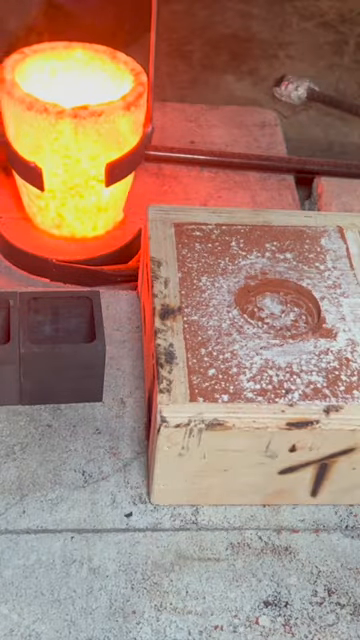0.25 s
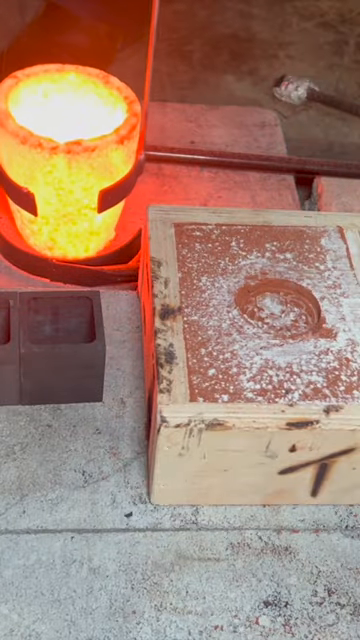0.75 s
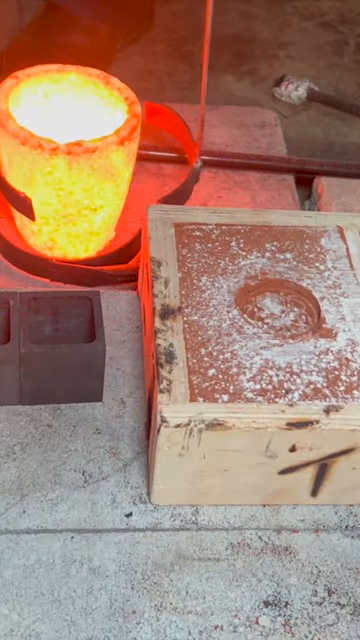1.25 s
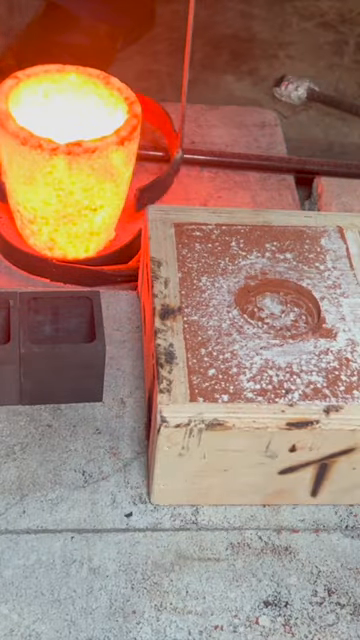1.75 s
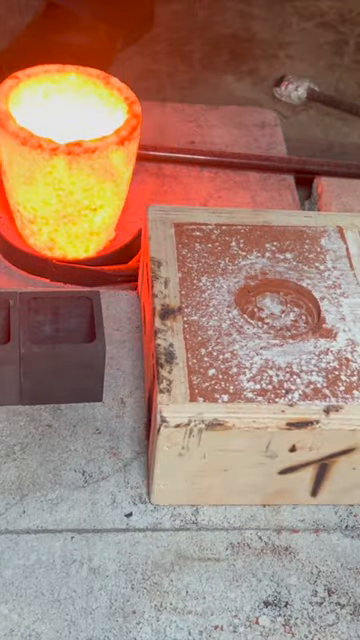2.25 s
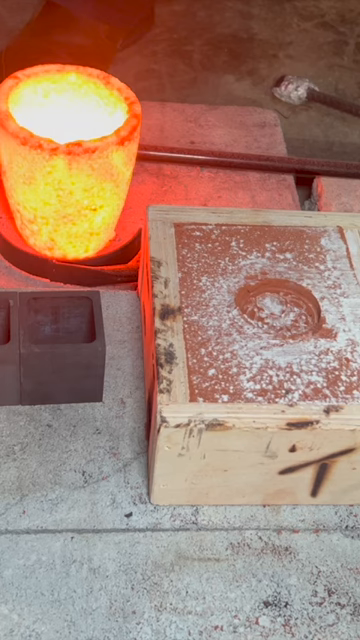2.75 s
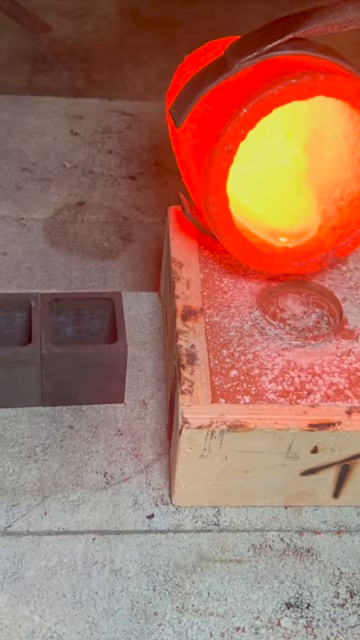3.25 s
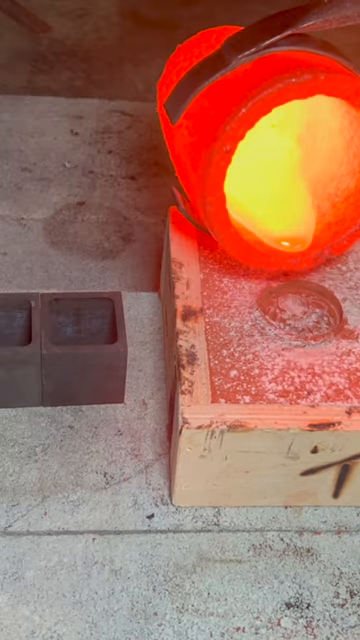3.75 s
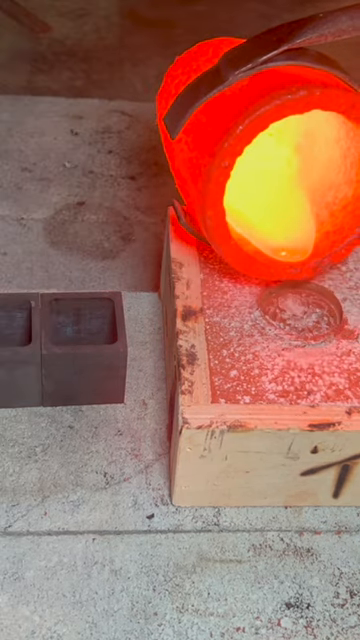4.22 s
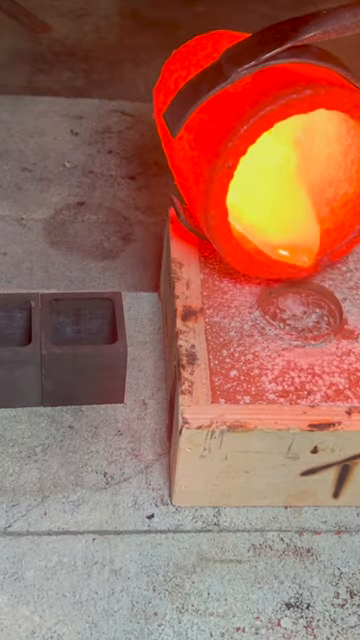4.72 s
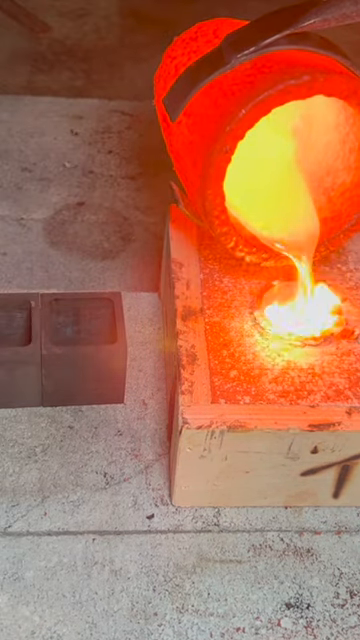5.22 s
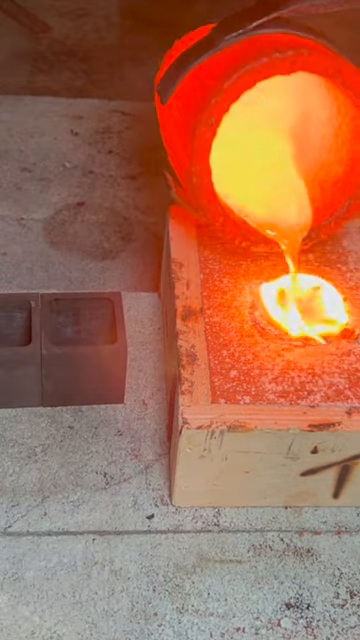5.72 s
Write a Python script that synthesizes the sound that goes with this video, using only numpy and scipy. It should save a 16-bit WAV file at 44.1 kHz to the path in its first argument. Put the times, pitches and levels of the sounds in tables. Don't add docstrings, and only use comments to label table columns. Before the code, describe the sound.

In a small workshop over low rumble and faint hiss, tongs scrape a hot crucible in short gritty strokes with a hollow hum. They drop left with a bright clang. After a cut come soft knocks and creaks, then molten metal splutters in a sand mould and a loose handle tinkles. Close stereo microphone.

```python
import sys
import numpy as np
from scipy import signal
from scipy.fft import rfft, irfft, next_fast_len
from scipy.io import wavfile
from scipy.ndimage import uniform_filter1d

SR = 44100
rng = np.random.default_rng(int(sys.argv[2]) if len(sys.argv) > 2 else 0)


def wav_out(sig):
    wavfile.write(sys.argv[1], SR, np.round(np.clip(np.atleast_2d(sig).T, -1, 1) * 32767).astype(np.int16))


def boost_factor(decibels):
    exponent = np.asarray(decibels, float) / 20
    return 10 ** exponent


N = 263718

# (time [s], bustle [dB])
BUSTLE = [(0.0, 2.5), (0.42, 1), (0.63, 8), (1.01, 2), (1.7, 0), (2.33, 3.5), (2.47, 14), (2.92, 5),
          (3.0, -0.5), (3.25, 4.5), (3.48, 8.5), (3.7, 1), (3.86, 2), (4.08, 5.5), (4.7, 1.5), (5.06, 4.5),
          (5.61, 2.5), (5.98, 6.5)]
# (start [s], end [s], level [dB])
CHANGE = (2.873, 2.901, -6)


def evened(x):
    return x / np.sqrt(np.mean(x ** 2) + 1e-20)


def read(points, hz):
    f, value = np.transpose(points)
    return np.interp(np.log(hz + 1), np.log(f + 1), value)


def curve(rows):
    return np.interp(np.arange(N) / SR, *np.transpose(rows))


def add(mix, s, sound):
    part = mix[round(s * SR):][:len(sound)]
    part += sound[:len(part)]


def swell(s, db, rise, t60, hold=0):
    t = np.arange(N) / SR - s
    return np.clip(t / rise, 0, 1) ** 2 * boost_factor(db - 60 * np.maximum(t - rise - hold, 0) / t60)


def colour(x, points):
    size = next_fast_len(x.shape[-1] + 2048, True)
    gain = boost_factor(read(points, np.fft.rfftfreq(size, 1 / SR)))
    return irfft(rfft(x, size) * gain, size)[..., :x.shape[-1]]


def band(x, lo_hz, hi_hz):
    sos = signal.butter(2, [lo_hz, min(hi_hz, SR / 2.1)], "bandpass", fs=SR, output="sos")
    return signal.sosfilt(sos, x)


def resonate(x, hz, width):
    r = np.exp(-np.pi * width / SR)
    return signal.lfilter([1 - r * r, 0, r * r - 1], [2, -4 * r * np.cos(2 * np.pi * hz / SR), 2 * r * r], x)


def resonate_twice(x, hz, width):
    return evened(resonate(resonate(x, hz, width), hz, width))


def ring(modes, seconds):
    t = np.arange(round(seconds * SR)) / SR
    return sum(boost_factor(db - 60 * t / t60) * np.sin(2 * np.pi * (hz * t + rng.random())) for hz, db, t60 in modes)


def pings(rows):
    out, t = np.zeros(N), np.arange(5000) / SR
    for (s, db, hz, t60), (gap, phase) in zip(rows, rng.uniform(-1.03, 1, (len(rows), 2))):
        partner_hz = hz * (1 + .06 * gap)
        pair = np.sin(2 * np.pi * hz * t) + .4 * np.sin(2 * np.pi * (partner_hz * t + phase))
        add(out, s, boost_factor(db - 60 * t / max(t60, .004)) * np.minimum(t / .0006, 1) * pair)
    return out


def air(points, patchy_db, flicker_db, size=512):
    # (frequency [Hz], likeness [1])
    coherence = [(40, 0.96), (100, 1), (400, 0.29), (1000, 0.1), (2500, 0.27), (5500, .2), (7000, 0.31)]
    frames, hz = N // (size // 4) + 5, np.fft.rfftfreq(size, 1 / SR)
    a, b, c, d, patches = rng.standard_normal((frames, len(hz), 5)).T
    patches = evened(uniform_filter1d(uniform_filter1d(patches, size=6, axis=0), size=20, axis=1))
    flicker = evened(uniform_filter1d(rng.exponential(1, frames) - 1, size=3))
    same = np.clip(read(coherence, hz), -1, 1)[:, None]
    left = a + 1j * b
    z = np.array([left, same * left + np.sqrt(1 - same ** 2) * (c + 1j * d)])
    z *= boost_factor(read(points, hz)[:, None] + patchy_db * patches + flicker_db * flicker)
    return evened(signal.istft(z, nperseg=size, noverlap=size - size // 4)[1][:, :N])


def floor_rumble(drive):
    # (frequency [Hz], density [dB per Hz])
    rumble_spectrum = [(12, -39), (25, -14), (42, 5), (85, 0), (102, -8.5), (161, -10.5), (195, -18),
                       (269, -27), (367, -28.5), (392, -40), (500, -38), (650, -64), (1100, -120)]
    # (frequency [Hz], width [Hz], level [dB])
    room_modes = [(82, 11, 2.5), (105, 16, -5), (160, 10, -15)]
    # (time [s], level [dB])
    drift = [(0.0, -68.5), (1.9, -70.5), (2.25, -65), (2.9, -65), (3.3, -61), (3.62, -59), (3.78, -69.5),
             (4.0, -65), (4.78, -70.5), (5.98, -66)]
    # (time [s], level [dB])
    thumps = [(.07, -70), (.55, -62), (.97, -58.5), (2.47, -50.5), (2.9, -62.5), (4.829, -55.5),
              (5.099, -65), (5.37, -73), (5.51, -62.5), (5.87, -79.5)]
    rumble = air(rumble_spectrum, 0.38, 0.11, size=4096)
    peaks = sum(boost_factor(db) * evened(resonate(drive, hz, w)) for hz, w, db in room_modes)
    shake = boost_factor(curve(drift)) + sum(swell(s, db, 0.023, 0.40606) for s, db in thumps)
    return shake * evened(rumble + peaks)


def furnace_draught(drive):
    # (frequency [Hz], width [Hz], level [dB])
    furnace = [(155, 7.9, -72), (97.1, 61, -65), (1749.5, 890, -97.5), (13710, 5900, -93)]
    # (time [s], level [dB])
    draught = [(0, -12), (1.2, -5), (2.15, -1), (2.25, 7), (2.87, -4), (2.9, -54)]
    return boost_factor(curve(draught)) * sum(boost_factor(db) * resonate_twice(drive, hz, w) for hz, w, db in furnace)


def creaking(drive):
    # (time [s], level [dB], hold [s], frequency [Hz])
    creaks = [(3.0, -82, .4, 2650), (3.8, -81, .5, 2600), (4.5, -85, .1, 2600), (5.0, -87, 0.41, 2600),
              (5.75, -79, .2, 2650), (3.03, -73, 0.079, 947), (3.26, -71, .27, 900), (3.28, -70, 0.16, 563),
              (3.06, -70, 0.046, 290), (3.3, -68, .28, 300), (4.0, -73, 0.26, 955), (4.08, -74, .14, 559),
              (4.08, -71, 0.19, 310)]
    q = 5
    return boost_factor(-9) * sum(swell(s, db, 0.054, 0.28, hold) * resonate_twice(drive, hz, hz / q)
                         for s, db, hold, hz in creaks)


def hiss_level():
    # (time [s], level [dB], rise [s], t60 [s])
    flares = [
        (2.3, -79.5, .2, 1.0),
        (4.82, -82, .2, 2.359),
    ]
    return boost_factor(-89.5 + 0.71 * curve(BUSTLE)) + sum(swell(*row) for row in flares)


def room_tone():
    # (frequency [Hz], density [dB per Hz])
    shuffle_spectrum = [(120, -16), (300, -0.5), (600, -11.5), (950, -15), (1500, -13.5), (2300, -14),
                        (4000, -28), (7000, -35.5)]
    # (frequency [Hz], density [dB per Hz])
    hiss_spectrum = [(2000, -27.5), (4000, -4), (5500, -10), (7500, -4.5), (10000, -2), (12500, -1),
                     (15500, 0.5), (16300, -29.5)]
    # (time [s], level [dB], rise [s], t60 [s])
    swing = (2.22, -73, .25, .05)
    drive = rng.standard_normal(N)
    shuffling = boost_factor(-84 + 1.266 * curve(BUSTLE)) * air(shuffle_spectrum, 2.2, 1.5)
    hiss = boost_factor(4.0) * hiss_level() * air(hiss_spectrum, 1.1, 1.9, size=256)
    whoosh = swell(*swing) * evened(band(drive, 1300, 5500))
    return furnace_draught(drive) + floor_rumble(drive) + shuffling + hiss + creaking(drive) + whoosh


def knocks():
    # (time [s], level [dB], weight [dB]: thud up,
    # tick down)
    small_knocks = [(1.949, -86, -11.5), (2.21, -80.5, 5.5), (2.838, -70, 10), (2.846, -69, 10),
                    (2.865, -68, 10.5), (2.854, -65.5, 10.5), (2.904, -51.5, 3.5), (2.923, -61.5, 13),
                    (3.043, -65.5, 4.5), (3.229, -73.5, 5.5), (3.313, -57.5, 5.5), (3.324, -68, 13.5),
                    (3.383, -67.5, 7), (3.451, -69.5, 4.5), (3.582, -62, -1), (3.589, -57, 8.5),
                    (3.629, -59, 3.5), (3.854, -73.5, 0.5), (3.893, -68.5, -0.5), (3.915, -63.5, 4.5),
                    (4.022, -79.5, -6), (4.102, -63, -8), (4.189, -71, 2.5), (4.217, -70, -2.5),
                    (4.264, -65.5, 6), (4.279, -64.5, 9.5), (4.619, -71.5, 6), (4.73, -70.5, 3.5),
                    (4.833, -59.5, 4), (4.883, -67.5, -0.5), (5.094, -82, -8), (5.283, -73, -7), (5.342, -65.5, 3),
             (5.362, -64.5, 5.5), (5.393, -73.5, -7), (5.877, -71.5, -1.5), (5.964, -61, 2)]
    out, t, rows = np.zeros(N), np.arange(4000) / SR, small_knocks
    body, snap = boost_factor(-60 * t / 0.034974), boost_factor(-60 * t / 0.0059)
    for (s, db, weight_db), noise in zip(rows, rng.standard_normal((len(rows), 4000))):
        thud = boost_factor(weight_db + 15) * band(noise * body, 190, 1237.6)
        knock = boost_factor(16.0) * band(noise * (0.38373 * body + snap), 890.0, 3261.8)
        tick = boost_factor(10.5 - weight_db) * band(noise * (0.79 * body + snap), 7500, 22000)
        add(out, s, boost_factor(db - 5.0) * (thud + knock + tick))
    grains = (rng.random(N) < 110 / SR) * boost_factor(6.25 * np.minimum(rng.exponential(1, N), 3))
    grains = grains * (np.arange(N) > CHANGE[1] * SR)
    puff = rng.standard_normal(200) * boost_factor(-60 * t[:200] / 0.0087)
    crackle = band(signal.oaconvolve(grains, puff)[:N], 3400.0, 15800)
    return out + boost_factor(2.0) * hiss_level() * crackle


def tinkle():
    # (time [s], peak [dB], low knock [dB], bell [dB])
    touches = [(5.6459, -56, -16.5, -32.5), (5.6556, -56, -13, -32), (5.6682, -65, -1, -20),
               (5.6867, -59, -2, -3), (5.6931, -58, -4, -25.5), (5.741, -58.5, -5, -20),
               (5.7917, -51, -8.5, -31), (5.828, -68.5, -10, -29.5), (5.8444, -62.5, -8.5, -29)]
    # (frequency [Hz], level [dB], t60 [s])
    handle_modes = [(8400, -1, 0.0278), (11500, -1.5, 0.027), (14096, -5, .022), (15500, -3.5, .018),
                    (2791.3, -15, 0.03)]
    out, t = np.zeros(N), np.arange(3000) / SR
    lucks = rng.standard_normal((len(touches), 2, len(handle_modes)))
    for (s, db, low_db, bell_db), luck in zip(touches, lucks):
        woken = [(hz * (1 + 0.0093 * a), level + 4.1 * b, t60)
                 for (hz, level, t60), a, b in zip(handle_modes, *luck)]
        puff = rng.standard_normal(len(t)) * boost_factor(-60 * t / 0.07424)
        add(out, s, boost_factor(db - 12.5) * ring(woken + [(5700, bell_db - 6, 0.06)], 0.17))
        add(out, s, boost_factor(db + low_db - 0.5) * band(puff, 1243.7, 2800.0))
        add(out, s, boost_factor(db - 10) * band(puff, 7200, 15500))
    return out


def splutter():
    # (time [s], peak [dB], pitch [Hz], sharp crack [dB])
    pops = [(4.835, -48, 483, -28), (4.8447, -52, 576, -1), (4.8515, -33.5, 760, -9.5),
            (4.855, -37, 685, -14), (4.86, -36, 600, -15), (4.865, -39, 616, -18), (4.868, -33.5, 640, -18),
            (4.875, -47, 477, -15), (4.8835, -54.5, 499, -3), (4.8896, -37, 557, -13.5),
            (4.897, -50, 450, -18), (4.905, -51.5, 600, -21), (4.913, -48, 560, -20),
            (4.9311, -39.5, 563, -20), (4.944, -48, 450, -13), (4.952, -53, 330, -18),
            (5.1, -48.5, 493, -10), (5.108, -54.5, 452, -20), (5.112, -56, 400, -10),
            (5.157, -59.5, 550, -10), (5.227, -54, 530, -12.5), (5.343, -50, 495, -15.5),
            (5.359, -57, 525, -8), (5.515, -52, 565, -12.5), (5.608, -60, 450, -11),
            (5.616, -55, 400, -17.5)]
    out, t = np.zeros(N), np.arange(1000) / SR
    for (s, db, hz, crack_db), luck in zip(pops, rng.uniform(-1, 1, (len(pops), 14))):
        bursts = [(-1, 1, 0), *luck[2:].reshape(4, 3)]
        for k, (late, size, pitch) in enumerate(bursts):
            f = hz * (1 + .35 * pitch)
            bubble = np.sin(2 * np.pi * f * t * (1 - 12 * t)) * np.exp(-f * t / 1.21) * np.minimum(t * f / .5, 1)
            crack_hz = 1500 * (1.04 + .15 * luck[1] + .3 * pitch)
            crack = np.sin(2 * np.pi * crack_hz * t) * t / 0.00044 * np.exp(1 - t / 0.00034)
            level = size * boost_factor(db + 1.5 - 9.4 * (k > 0))
            add(out, s + 0.00139 + 0.01 * (late + 1), level * (bubble + boost_factor(crack_db + 8.0) * crack))
    return out


def crucible_hum():
    # (frequency [Hz], width [Hz], level [dB])
    overtones = [(411, 98, 0.5), (640, 120, -2), (764, 125, -4.5), (874, 88, -11), (229, 80, -2)]
    # (time [s], level [dB], hold [s], hum [Hz], overtones [dB])
    strokes = [
        (0.521, -55, 0.033, 301, -9.5),
        (0.698, -69, .01, 310, 2),
        (0.989, -54, 0.013, 296, -3),
        (1.093, -60, 0.063, 307, -7.5),
    ]
    noise = rng.standard_normal(N)
    wall = evened(sum(boost_factor(db) * resonate_twice(noise, hz, w) for hz, w, db in overtones))
    wander, shake = evened(band(rng.standard_normal((2, N)), 7.7, 48))
    cycles = np.cumsum(1 + 0.039 * wander) / SR
    out = np.zeros(N)
    for s, db, hold, hz, wall_db in strokes:
        hum = boost_factor(3 + 2.5 * shake) * np.sin(2 * np.pi * hz * cycles)
        out += swell(s, db, 0.019, 0.1428, hold) * (boost_factor(wall_db) * wall + hum)
    return out


def scrape():
    # (time [s], peak [dB], shank [dB], slide [s])
    slips = [(0.337, -60, -35.5, 0.01703), (0.367, -61.5, -37, 0.0473), (0.4385, -64.5, -26, 0.17),
             (0.5185, -47, -26.5, 0.52), (0.5544, -43, -23.5, 0.01332), (0.5751, -62, -21, 0.081),
             (0.614, -45, -24.5, 0.033), (0.6655, -38.5, -42.5, 0.0762), (0.69, -45.5, -24, 0.12),
             (0.753, -57, -24.5, 0.25), (0.8147, -59, -35, 0.01224), (0.974, -50, -19.5, 0.1335),
             (0.991, -41.5, -17, 0.19), (1.01, -41.5, -14, 0.049), (1.0906, -46.5, -18.5, 0.065),
             (1.1368, -46.5, -16, 0.036), (1.179, -61, -12.5, 0.0583), (1.2342, -64, -23, 0.043),
             (1.25, -62, -17, 0.07)]
    grazes = [
        (2.4276, -36, -37.5, .02),
        (2.432, -57, -38, 0.31),
    ]
    # (time [s], level [dB], rise [s], t60 [s])
    drag = (0.7, -72.5, 0.7, 0.0004)
    # (frequency [Hz], level [dB], t60 [s])
    jaw_modes = [(3900, -14, .05), (5340, -9, .04), (5770, -9, 0.057), (5950, -8, 0.058), (6740, -10, .04),
                 (7170, -7, .05), (7410, 0, .07), (7570, -4, .06), (7960, -3, .03), (8400, 0.5, .035),
                 (9640, 2.5, .1), (10750, 2.5, 0.056), (11560, -2.5, 0.052), (12800, -4, .04),
                 (13600, -3, .04), (15350, -3, .06)]
    regripped_modes = [(4150, -14, .02), (5300, -7, .05), (5800, -6, .05), (6162, -9, .05),
                       (6765, -5, 0.061), (7400, -3, .04), (7900, 2, .04), (8240, -3, .05), (8460, -1, .05),
                       (9680, 3, .1), (10750, 2, .06), (11560, -2, .06), (12800, -5, .04), (13600, -5, .04),
                       (15350, -5, .06)]
    shank_modes = [(1529, -8, .12), (1870, -16, .06), (2215, -8, .1), (3763, -2, .21), (3794, -19, .1),
                   (4300, -12, .04)]
    # (frequency [Hz], density [dB per Hz])
    grit_spectrum = [(300, -0.5), (1200, -1), (2800, -10), (5000, -5), (8000, -1), (10000, 3.5),
                     (12500, -8), (15500, -10.5), (16300, -43.5)]
    # (time [s], level [dB], frequency [Hz], t60 [s])
    chinks = [(.519, -66, 3600, .06), (.517, -62, 805, 0.043), (.535, -64, 5950, .07),
              (.553, -61, 8420, .04), (.667, -63, 1650, .04), (.686, -64, 1050, .04), (.705, -61, 433, .07),
              (.705, -64, 620, .05), (.972, -63, 800, 0.043), (1.01, -58, 640, .07),
              (1.232, -70, 4000, .015)]
    regrip_s = .9
    grains = evened(rng.standard_normal(N) * boost_factor(2.3 * np.minimum(rng.exponential(1, N), 5)))
    jaws, handle, t = swell(*drag), np.zeros(N), np.arange(6000) / SR
    for s, db, shank_db, slide in slips + grazes:
        push = boost_factor(db - 3.5 - 60 * t / max(slide, .005)) * (1 - t / t[-1])
        add(jaws, s, push)
        add(handle, s, push * boost_factor(2 * shank_db + 19.5))
    late = np.arange(N) > regrip_s * SR
    steel = np.zeros(N)
    for held, modes in [(~late, ring(jaw_modes, .2)), (late, ring(regripped_modes, .2))]:
        steel += signal.oaconvolve(jaws * grains * held, modes / np.linalg.norm(modes))[:N]
    shank_ring = ring(shank_modes, .3)
    shank = signal.oaconvolve(handle * grains, shank_ring / np.linalg.norm(shank_ring))[:N]
    grit = colour(jaws * grains, grit_spectrum)
    return boost_factor(-4.0) * steel + boost_factor(1.5) * shank + boost_factor(-3.0) * grit + crucible_hum() + pings(chinks)


def clang():
    # (time [s], blow [dB], favoured frequency [Hz], its level [dB])
    blows = [
        (2.4848, -18, 13600, 4),
        (2.4871, -17.5, 7900, 3),
        (2.4934, -19.5, 5350, 5),
        (2.509, -24, 12200, 6),
        (2.513, -28, 6600, 4),
        (2.522, -27, 5900, 0),
    ]
    # (frequency [Hz], density [dB per Hz])
    crash_spectrum = [(60, -14), (250, -14), (800, -13.5), (1300, -7.5), (3000, -5.5), (5500, 0),
                      (9500, -3), (13500, -2.5), (15000, -11), (16500, -28)]
    steel_hz = [1007, 1400, 1852, 2180, 2336, 2524, 2884, 3494, 3779, 4084, 4500, 5345, 5830, 5930, 6417,
                6690, 6779, 7030, 7569, 7954, 8374, 8872, 9620, 10300, 11520, 12240, 12290, 12915, 13695,
                15340]
    steel_db = [-13, -12, -10, -7, -5, -7, -11, -6, -10, -8, -7, 5, -7, -10, -4.5, -10, -4.5, -8, -4.5, -8,
                -4, -9, -6, -7, -4.5, -5.5, -5.5, -2, -5, -13]
    # (frequency [Hz], t60 [s])
    damping = [(1000, .28), (2000, .38), (4000, .36), (5400, .34), (6800, .35), (9000, .25), (12000, 0.2),
               (15000, .14)]
    out, size = np.zeros(N), SR // 2
    t = np.arange(size) / SR
    for s, db, favoured_hz, favoured_db in blows:
        noise = rng.standard_normal(size) * (boost_factor(1.5 - 60 * t / .012) + boost_factor(-3 - 60 * t / 0.11))
        favoured = boost_factor(favoured_db - 40 * t / .05) * resonate(noise, favoured_hz, favoured_hz / 9)
        add(out, s, boost_factor(db) * np.minimum(t / 0.00017, 1) * (colour(noise, crash_spectrum) + favoured))
    hz, luck = rng.uniform(500, 16000, 600), rng.standard_normal((2, 600))
    dense_db = read(crash_spectrum, hz) + 1.5 * luck[0] - 15.5
    dense = zip(hz, dense_db, read(damping, hz) * np.clip(1 + luck[1] / 10, .5, 1.15))
    clear = zip(steel_hz, steel_db, read(damping, np.array(steel_hz)))
    onset = np.minimum(t[:round(.4 * SR)] / 0.021, 1)
    add(out, blows[0][0], boost_factor(-33.0) * onset * (ring(clear, .4) + ring(dense, .4)))
    return out


def room(x):
    # (frequency [Hz], t60 [s])
    room_decay = [(200, 0.45), (1000, 0.045), (4000, 0.15), (8000, 0.23), (14000, .16)]
    taps = np.zeros((2, SR // 2))
    at = np.arange(120, SR // 2 - 20, 20) + rng.integers(0, 20, (2, (SR // 2 - 121) // 20))
    np.put_along_axis(taps, at, rng.choice([-1., 1.], at.shape), 1)
    hz, t, z = signal.stft(taps, SR, nperseg=256)
    tail = signal.istft(z * boost_factor(-60 * t / read(room_decay, hz)[:, None]), SR, nperseg=256)[1]
    return signal.fftconvolve(x[None], tail / np.linalg.norm(tail[0]), axes=1)[:, :N]


def shaded(x):
    # (frequency [Hz], level [dB])
    shade = [(300, 9), (1000, -2.5), (3000, -2.5), (5000, -7.5), (7000, -1.5), (9000, 0)]
    scatter = rng.standard_normal(500) * boost_factor(-60 * np.arange(500) / SR / 0.033)
    scatter -= uniform_filter1d(scatter, size=40)
    scattered = signal.oaconvolve(x, scatter / np.linalg.norm(scatter))[:N]
    return colour(0.33 * np.roll(x, shift=2) + 0.68 * scattered, shade)


def scene():
    # (time [s], level [dB], frequency [Hz], t60 [s])
    part_pings = [(3.043, -64, 2620, .02), (3.088, -70, 1500, .015), (3.1314, -76, 7500, .015),
                  (3.16, -77, 2710, .02), (3.184, -70, 2580, .025), (3.208, -72, 7400, .015),
                  (3.21, -73, 3900, .015), (3.229, -68, 1790, 0.023), (3.264, -71, 4000, .015),
                  (3.303, -68, 2000, .015), (3.32, -74, 5800, .1), (3.45, -69, 1900, 0.031),
                  (3.629, -61.5, 4090, .015), (3.643, -70, 2000, .02), (3.854, -69, 2600, .02),
                  (3.854, -69.5, 4200, .012), (3.872, -72, 2600, .03), (3.893, -70, 3940, .012),
                  (3.916, -62, 480, .04), (4.102, -60, 4400, .012), (4.19, -68, 8100, .012),
                  (4.217, -68, 6870, .035), (4.22, -73, 4400, .03), (4.264, -59, 500, 0.045),
                  (4.279, -66, 4500, .015), (4.4, -71, 4000, .012), (4.619, -68, 2050, .015),
                  (4.709, -75, 2000, .015), (4.729, -65.5, 4250, .015), (4.834, -55, 2500, .015),
                  (5.283, -68, 4200, .015), (5.393, -65, 4300, 0.013), (5.517, -69, 1500, 0.022),
                  (5.652, -68, 1550, .04), (5.657, -77, 4850, .04), (5.687, -68, 1400, 0.074),
                  (5.69, -70, 2900, .05), (5.692, -70, 2150, .04), (5.693, -71, 6900, .03),
                  (5.741, -64, 1600, .04), (5.742, -69, 8400, .03), (5.755, -73, 1410, .05),
                  (5.791, -65, 2900, .05), (5.792, -67, 8550, .03), (5.8, -73, 2000, .07),
                  (5.93, -72, 2600, .02), (5.948, -69, 1600, 0.021), (5.949, -74, 7200, .008),
                  (5.964, -61, 2650, .009), (5.964, -62, 3800, .007)]
    tongs, drop, melt = scrape(), clang(), splutter()
    small = knocks() + tinkle() + pings(part_pings)
    left = tongs + drop
    wet = room(boost_factor(-11.5) * tongs + boost_factor(-7.5) * drop + boost_factor(-2.5) * small + boost_factor(-9.5) * melt)
    x = boost_factor(0.5) * np.array([left, shaded(left)]) + small + melt + wet + room_tone()
    start, end, dip_db = CHANGE
    hush = np.interp(np.arange(N) / SR, [start - .002, start, end - .002, end], [0, dip_db, dip_db, 0])
    low = uniform_filter1d(x, size=60)
    return low + (x - low) * boost_factor(hush)


def low_pass(x):
    return signal.sosfilt(signal.butter(12, 16880, fs=SR, output="sos"), x)


def record(dry):
    # (frequency [Hz], share of the common port [1])
    merge = [(5500, 0), (7000, .6), (8500, .93), (10000, .97)]
    # (frequency [Hz], phase the left leads by [rad])
    lead = [(6500, 0), (7600, -.6), (8600, -1.5), (10000, -3.14), (11400, -4.3), (12400, -5.45),
            (13400, -6.28), (14500, -7.1), (15500, -8.3), (16500, -9.5)]
    size = next_fast_len(N, True)
    hz, (left, right) = np.fft.rfftfreq(size, 1 / SR), rfft(dry, size)
    share = np.clip(read(merge, hz), 0, 1)
    turn = np.exp(.5j * read(lead, hz))
    bass_cut = 1 / np.sqrt(1 + (34 / (hz + 1)) ** 8)
    ports = [left * turn, (share * left + (1 - share) * right) / turn]
    return low_pass(irfft(ports * bass_cut, size)[:, :N])


dry = scene()
out = record(dry)
wav_out(out)
```